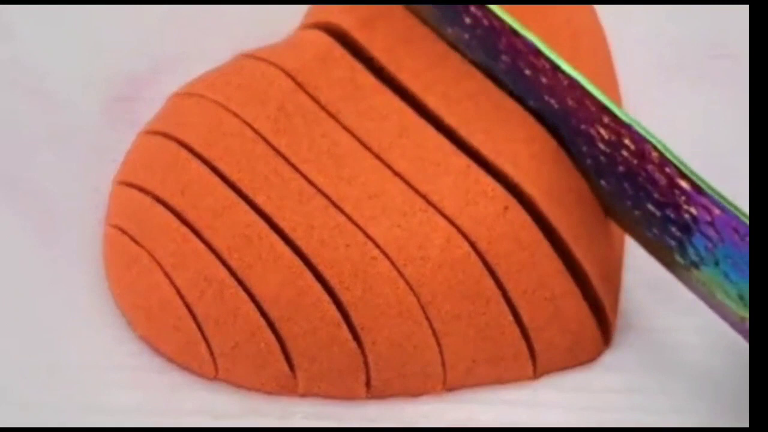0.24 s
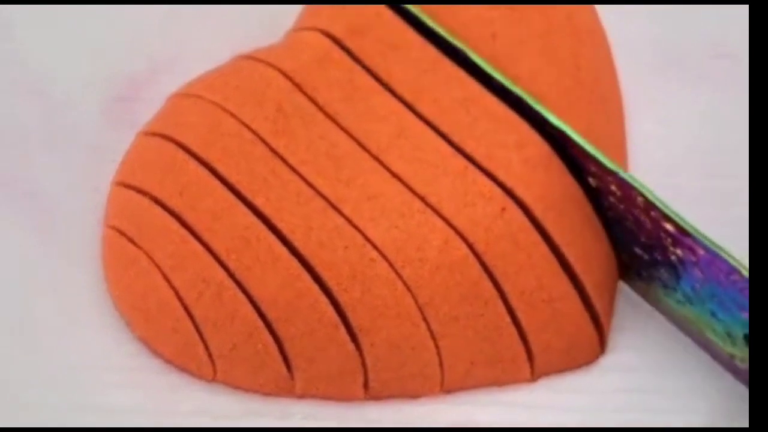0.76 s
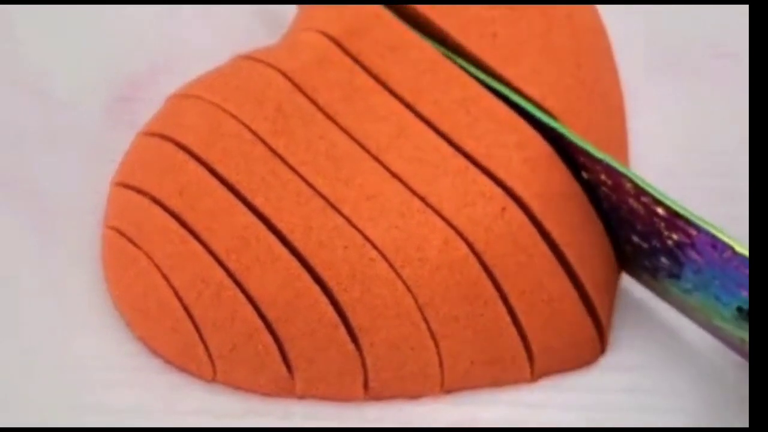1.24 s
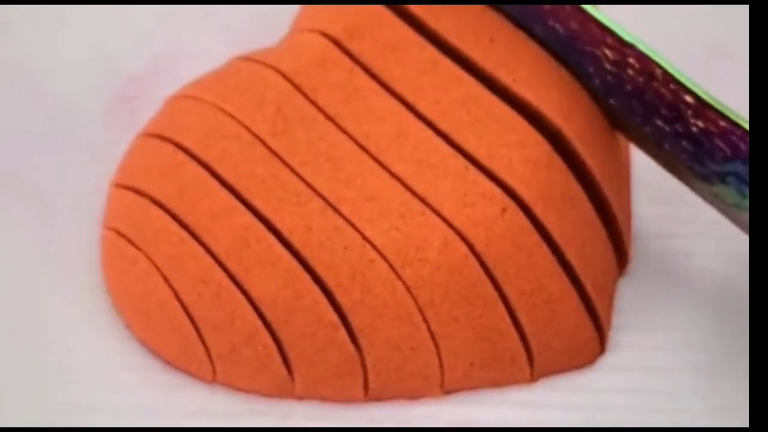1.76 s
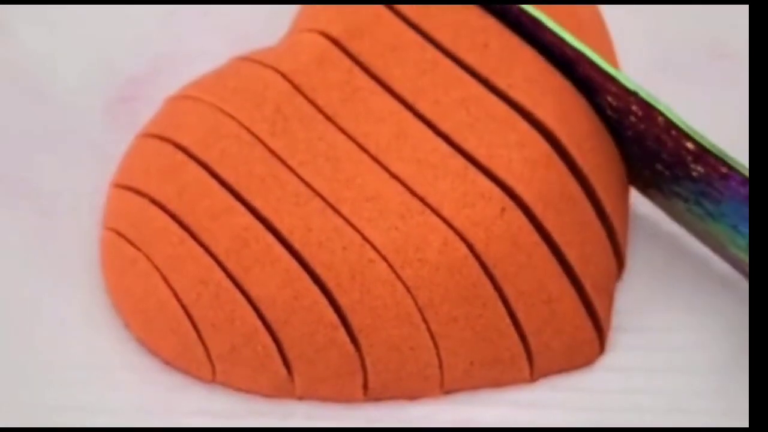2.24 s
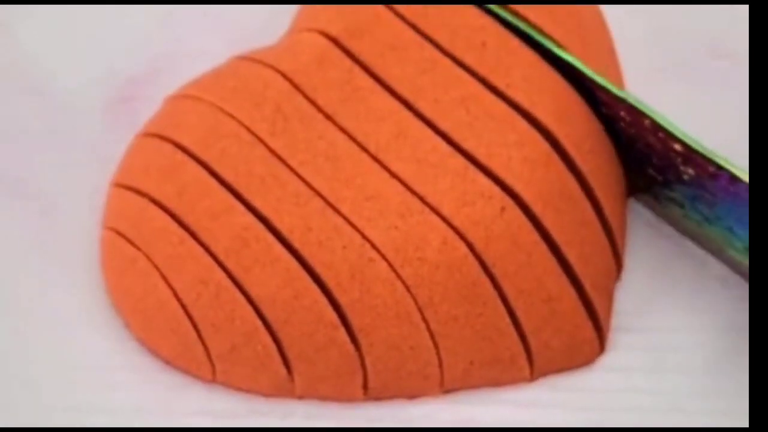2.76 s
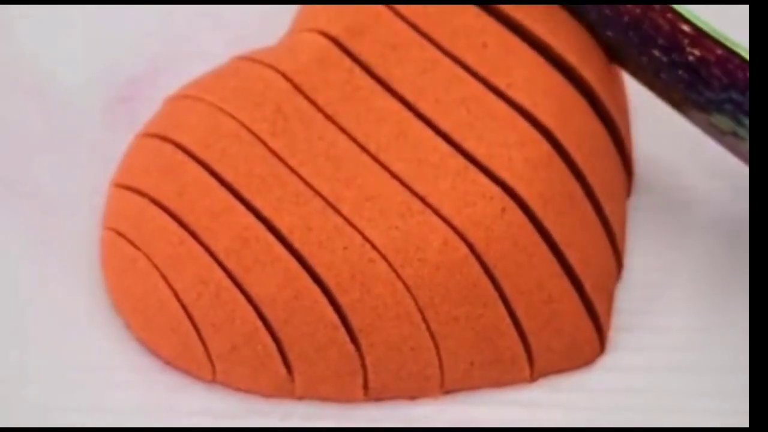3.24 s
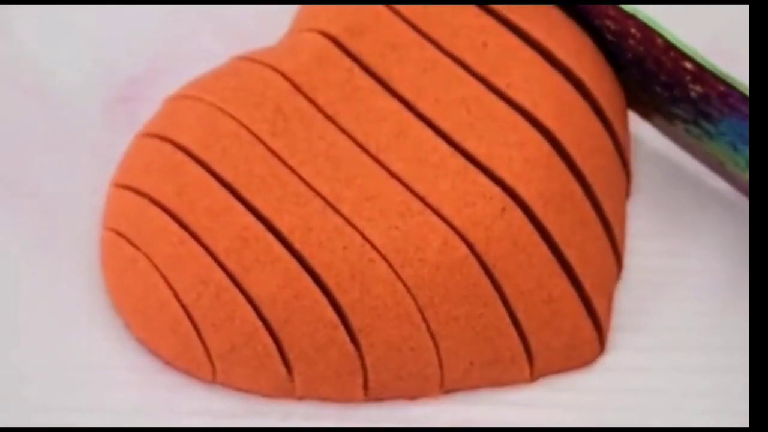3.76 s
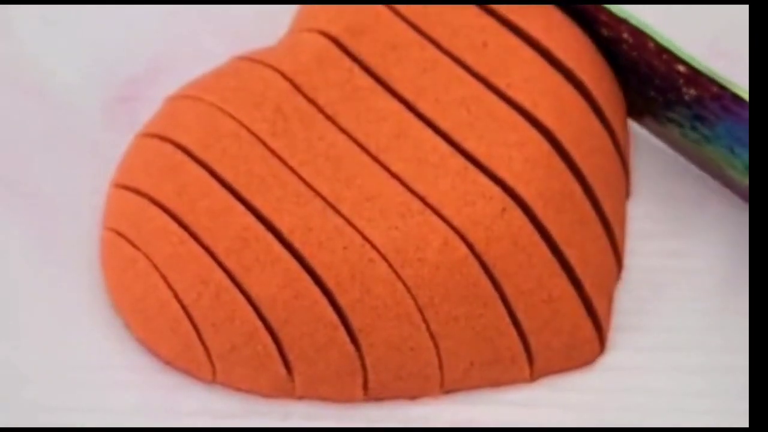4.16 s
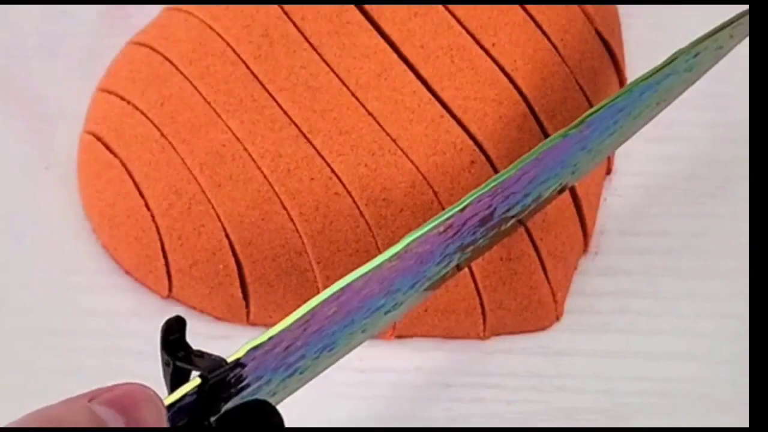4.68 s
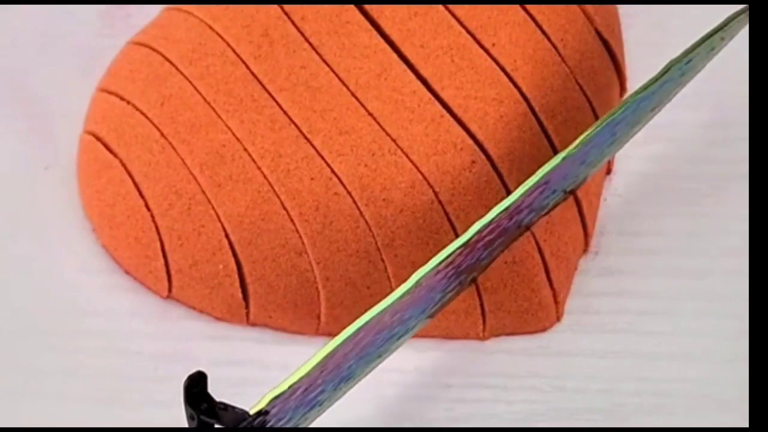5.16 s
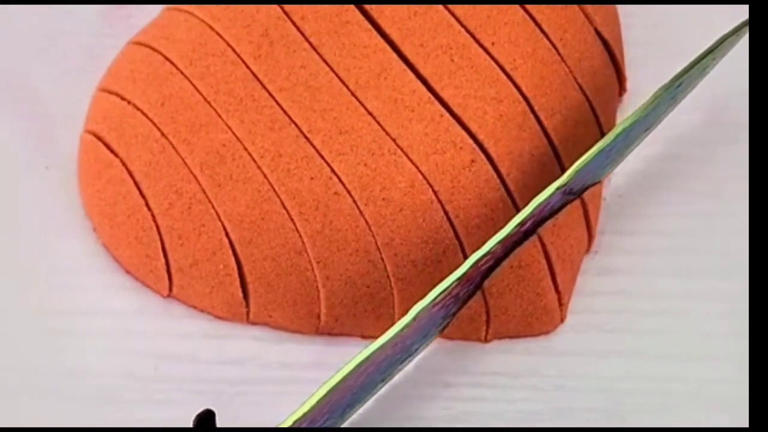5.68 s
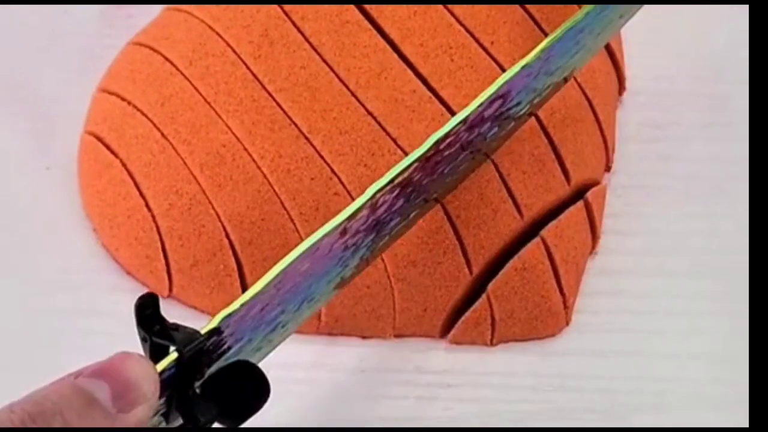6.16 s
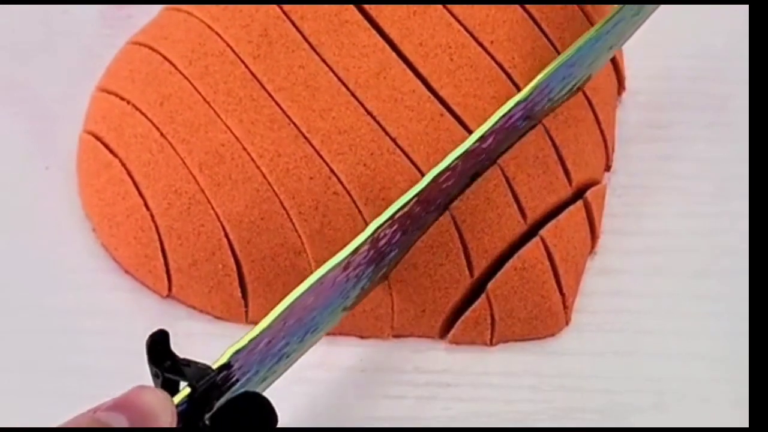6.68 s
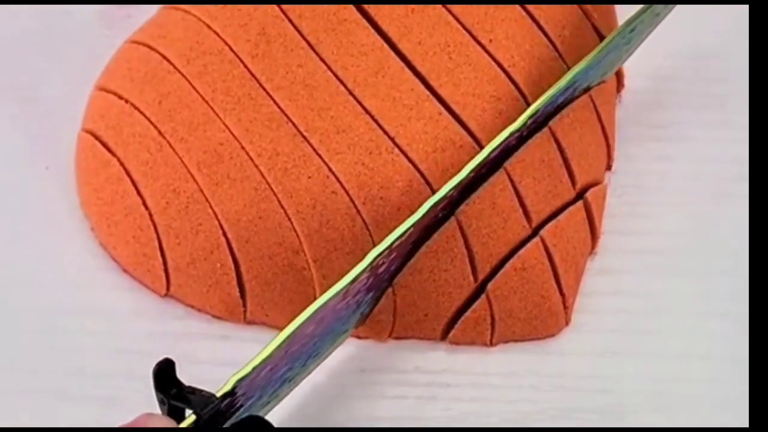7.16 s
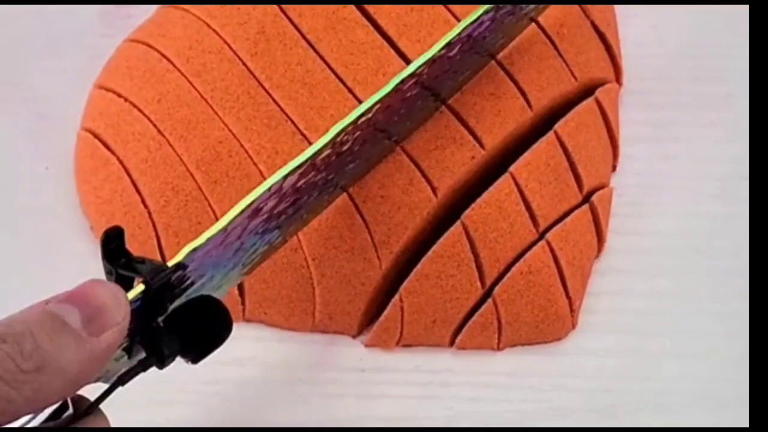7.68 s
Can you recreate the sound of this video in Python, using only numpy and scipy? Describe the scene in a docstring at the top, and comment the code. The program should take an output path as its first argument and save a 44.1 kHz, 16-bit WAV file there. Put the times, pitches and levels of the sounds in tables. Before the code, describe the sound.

Close, dry crunchy hisses of a blade pressing through damp packed sand, swelling and fading cut after cut, with dull taps on the board.

```python
"""On a board, close to the microphone: a knife slices a block of soft, sticky sand, six takes joined end to end.
Thousands of random grains, bunched in lumps, drive three filters: the hiss of sand, the scrape of the blade
and the rumble of the board. Narrow resonances let the blade sing, and short swinging pushes are its edge
knocking the board. The block is turned halfway, which changes how the board rings.
Hollows open and drift in the sound, and in places it spreads between left and right."""
import sys
import numpy as np
from scipy import signal
from scipy.io import wavfile
from scipy.ndimage import uniform_filter1d

SR = 44100
rng = np.random.default_rng(int(sys.argv[2]) if len(sys.argv) > 2 else 0)


def master_out(mix):
    """Clip the mix to full scale and print it as 16-bit PCM to the path in sys.argv[1]."""
    frames = np.transpose(np.atleast_2d(mix))
    ceiling = np.clip(frames, -1, 1)
    pcm = np.round(ceiling * 32767).astype(np.int16)
    wavfile.write(sys.argv[1], SR, pcm)


N = 349272

# where the takes begin, and the end of the last: start_s
TAKE_STARTS = [0, 1.311, 2.895, 4.528, 6.098, 7.673, 8]


def amp(db):
    """Amplitude factor of a level in dB."""
    return 10 ** (np.asarray(db) / 20)


def evened(x):
    """Scales a signal to rms 1."""
    return x / np.sqrt(np.mean(x ** 2) + 1e-20)


def read(points, hz):
    """Reads a colour curve at any pitch, straight between its points on a log pitch scale."""
    point_hz, level_db = np.transpose(points)
    return np.interp(np.log(hz + 1), np.log(point_hz + 1), level_db)


def response(colour, modes, size=8192):
    """Causal (minimum-phase) impulse response of energy 1 for a broad colour with resonances on it."""
    hz = abs(np.fft.fftfreq(size, 1 / SR))
    gain = amp(read(colour, hz))
    for mode_hz, width_hz, peak_db in modes:
        peak = 1 / (1 + (2 * (hz - mode_hz) / width_hz) ** 2)
        gain = gain * (1 + (amp(peak_db) - 1) * peak)
    log_gain = np.log(np.maximum(gain, 1e-5))
    phase = -signal.hilbert(log_gain).imag
    taps = np.fft.ifft(np.exp(log_gain + 1j * phase)).real[:size // 2]
    return taps / np.linalg.norm(taps)


def clumps(ms):
    """Uneven crumbling of rms 1: lumps at random moments that start sharply and decay with time constant ms."""
    decays = 1000 * np.arange(8192) / SR / ms
    lump = np.exp(-decays) * (1 - np.exp(-10 * decays))
    starts = rng.standard_normal(N) * (rng.random(N) < 4000 / ms / SR)
    x = signal.oaconvolve(abs(starts), lump)[:N]
    return evened(x - x.mean())


def grains(per_s, spread_db, crumble_db):
    """Grains that snap at random moments, a few of them large, swelling with the crumbling; rms 1."""
    size = amp(spread_db * np.minimum(rng.exponential(1, N), 5) + crumble_db)
    snaps = rng.random(N) < per_s / SR
    return evened(size * rng.standard_normal(N) * snaps)


def levels(t):
    """Hiss follows effort and slips, singing follows hiss, scrape and rumble follow a body level; all in dB."""
    # how hard the blade works, one curve a take; the first starts mid-cut, the last breaks off loud
    # columns: time_s, hiss_db
    effort = [
        [(0, -38), (.3, -37.5), (.5, -37.5), (.62, -40), (.73, -43), (.825, -42), (.85, -49), (.95, -47.5),
         (1.05, -47.5), (1.23, -49.5), (1.309, -47.5)],
        [(1.313, -60), (1.338, -52), (1.362, -49), (1.38, -45), (1.42, -46.5), (1.46, -36), (2.3, -37.5),
         (2.44, -42), (2.5, -48), (2.6, -50), (2.63, -41.5), (2.72, -41), (2.78, -48.5), (2.87, -48.5),
         (2.893, -55.5)],
        [(2.897, -73), (2.915, -54), (2.95, -50.5), (2.975, -43.5), (3.03, -39.5), (3.2, -37), (3.6, -37),
         (3.71, -41.5), (4.02, -42), (4.06, -50.5), (4.17, -44), (4.23, -40), (4.37, -40.5), (4.47, -45.5),
         (4.5, -52), (4.526, -58)],
        [(4.535, -70.5), (4.78, -71), (4.8, -65), (4.855, -64), (4.87, -56.5), (4.98, -48), (5.13, -42.5),
         (5.25, -44.5), (5.6, -45.5), (5.84, -49.5), (5.875, -55.5), (5.9, -61), (5.915, -44), (5.935, -43.5),
         (5.98, -46), (6.03, -47), (6.05, -60), (6.095, -78)],
        [(6.1, -53.5), (6.185, -50.5), (6.21, -40.5), (6.5, -38.5), (7.15, -41), (7.27, -44.5), (7.32, -44),
         (7.4, -44.5), (7.5, -47), (7.58, -44.5), (7.645, -43), (7.67, -64)],
        [(7.675, -56.5), (7.73, -49), (7.82, -42), (7.92, -38.5)],
    ]
    # sudden slips where a lump of sand gives way
    # columns: start_s, peak_hiss_db, length_ms, body_db (scrape and rumble re their usual share)
    slips = [(0.249, -36, 18, -17), (0.927, -42, 48, -4), (1.088, -44.5, 49, -8), (1.137, -42.5, 18, -11),
             (1.319, -45, 11, -10), (1.355, -52.5, 82, 8.5), (1.369, -37, 9.6, -12), (1.445, -37, 37, -6),
             (1.55, -40, 76, -2), (1.508, -37.5, 24, -2.5), (2.158, -36, 44, -1), (2.81, -49, 80, 1),
             (3.026, -37.5, 11, 1), (3.054, -35, 10, -9), (3.077, -36, 15, -14), (3.125, -33, 13, -1),
             (3.163, -34, 12, -3), (3.194, -33.5, 14, -8), (3.224, -33, 14, -3), (3.25, -36.5, 19, 1),
             (3.276, -36, 12, 2), (3.409, -38, 9.9, -12), (3.558, -36, 30, -8), (3.66, -40.5, 20, -9),
             (4.2, -34.5, 19, -6), (4.288, -34, 42, -1.5), (4.336, -40.5, 22, 6), (4.405, -39, 15, -3),
             (4.48, -35, 15, -2), (4.55, -64.5, 41, 1), (4.605, -67, 35, -5), (4.648, -57, 74, -1.5),
             (4.66, -60, 14, -6), (4.676, -54, 30, -9), (4.72, -63, 33, -5), (4.745, -62, 30, 1),
             (5.125, -44, 38, -5), (5.335, -42.5, 35, -3), (5.4, -43, 14, 0), (5.449, -39, 17, -16),
             (5.843, -41.5, 24, 1.5), (5.991, -39.5, 25, 4), (6.016, -46, 19, 3), (6.102, -41, 25, -10),
             (6.205, -38.5, 21, -6), (6.288, -38, 13, 1.5), (6.51, -38.5, 20, -3), (6.577, -37, 14, -15),
             (6.62, -40, 18, -4), (6.64, -42, 28, 5), (7.51, -42, 41, -0.5), (7.69, -59, 18, -6),
             (7.779, -41, 8.6, -5), (7.872, -33.5, 20, -6)]
    # how each take loads blade and board
    # columns: scrape_db and rumble_db (re hiss at the usual level), growth_db_per_s (both, as the blade sinks)
    loads = [(-9.5, -4, 0.1), (-10, -4.5, 1.5), (-9, -4.5, 2), (-7.5, -6, 2.5), (-9, -7, 2),
             (-11, -7.5, 13)]
    usual_db = -36.5
    scrape_follows, rumble_follows, song_follows = 1, 1.345, 1  # dB per dB away from the usual level
    slip_rise = 0.13  # share of its length that a slip takes to swell

    steady_power = amp(np.interp(t, *np.concatenate(effort).T)) ** 2
    hiss_power, body_power = steady_power.copy(), steady_power.copy()
    for start_s, peak_db, length_ms, share_db in slips:
        u = np.clip(1000 * (t - start_s) / length_ms, 0, 1)
        ramp = np.minimum(u / slip_rise, (1 - u) / (1 - slip_rise))
        swell = np.sin(np.pi / 2 * ramp) ** 2
        hiss_power += amp(peak_db) ** 2 * swell
        body_power += amp(peak_db + share_db) ** 2 * swell

    take = np.searchsorted(TAKE_STARTS, t, "right") - 1
    scrape_share_db, rumble_share_db, growth_db_per_s = np.array(loads)[take].T
    sunk_db = usual_db + growth_db_per_s * (t - np.array(TAKE_STARTS)[take])
    hiss_db = 10 * np.log10(hiss_power)
    body_off_db = 10 * np.log10(body_power) - usual_db
    scrape_db = sunk_db + scrape_share_db + scrape_follows * body_off_db
    rumble_db = sunk_db + rumble_share_db + rumble_follows * body_off_db
    song_db = usual_db + song_follows * (hiss_db - usual_db)
    return hiss_db, scrape_db, rumble_db, song_db


def bodies():
    """How sand, blade and board ring: impulse responses of hiss, scrape and rumble for each of the six takes."""
    # broad colours, columns: pitch_hz, level_db (per Hz); the hiss of the last two takes has its own
    hiss = [(1650, -21), (2800, -10.5), (3970, -7), (5630, -2), (6240, -4), (6770, -3.5), (7680, 1.5),
            (10200, 2), (11100, 2), (13800, 2.5), (15100, 0), (16100, 17), (16500, -40)]
    hiss_later = [(1650, -30), (2800, -20), (3970, -8), (5630, -1.5), (6770, -0.5), (7680, 2), (10200, 3),
                  (13800, 1.5), (15100, 0.5), (16100, 15.5), (16500, -34)]
    scrape = [(530, -34.5), (900, 3), (988, -2), (1340, -1.5), (1620, -2.5), (1990, -2), (2200, -1),
              (2890, -2), (3600, -9), (4680, -17.5), (7920, -120)]
    rumble = [(12, -49), (20, -28.5), (129, -3.5), (369, -1), (411, 1.5), (508, -8), (576, -3.5),
              (1400, -18), (1820, -63), (3080, -120)]
    rumble_turned = [(12, -56), (20, -31), (134, -1), (178, -9.5), (220, 0.5), (433, -4), (596, -8),
                     (1400, -15), (1820, -72), (3080, -120)]
    # the blade sits differently after the turn and again one take later: two such colours
    scrape_turned = [
        [(470, -32.5), (800, -3.5), (1150, -7), (1320, -2.5), (1530, -11), (1850, -1.5), (2660, -12),
         (3600, -14.5), (4680, -16), (7920, -120)],
        [(470, -46), (800, -11.5), (1050, -15), (1130, -19), (1510, -10.5), (1890, -2), (2220, -9),
         (3600, -13.5), (4680, -15), (7920, -120)],
    ]
    # resonances standing out of those colours, columns: pitch_hz, width_hz, peak_db
    blade = [(1880, 140, 2.5), (6150, 100, 3.5), (7500, 81, 6.5), (11080, 100, 7)]
    board = [(125, 140, 3.6), (197.4, 12, 5.4), (326, 35, 5.9), (425, 26, 6.7), (572, 33, 4.7),
             (687, 33, 8.3), (904, 11, 14.2)]
    board_turned = [(140, 36, 6.3), (218.5, 21, 3.3), (285, 21, 3.6), (376.5, 29, 6.5), (598, 76, 9.8),
                    (700, 30, 9.5), (944, 75, 4.7)]

    first = response(hiss, blade), response(scrape, blade), response(rumble, board)
    turned_board = response(rumble_turned, board_turned)
    turned = response(hiss, blade), response(scrape_turned[0], blade), turned_board
    later = response(hiss_later, blade), response(scrape_turned[1], blade), turned_board
    return [first] * 3 + [turned] + [later] * 2


def ringing(drives):
    """Sends the three drives through their bodies; the ringing stops dead at each join."""
    out = np.zeros(N)
    for start_s, end_s, take_bodies in zip(TAKE_STARTS, TAKE_STARTS[1:], bodies()):
        at = slice(round(start_s * SR), min(round(end_s * SR), N))
        for drive, body in zip(drives, take_bodies):
            out[at] += signal.oaconvolve(drive[at], body)[:at.stop - at.start]
    return out


def singing(drive):
    """Grains excite four narrow modes of the blade; the lowest bends as the sand grips the blade."""
    # what a slowly dragged blade sings with; the first pitch gives way to the bending one
    # columns: pitch_hz, width_hz, level_db (re hiss, before the swell along the take)
    modes = [(1956, 84, -20), (6330, 58, -25.5), (7500, 400, -36), (11500, 340, -24.5)]
    # how the blade sings along each take
    # columns: time_s, lowest_mode_hz, lowest_mode_db, second_mode_db (both added to the mode level)
    course = [
        [(0.0, 1980, 4, 15), (0.16, 1820, 3.5, 7), (0.8, 1930, 2, 1), (0.93, 1910, 7.5, 7), (1.31, 1960, 6, 16)],
        [(1.312, 2020, 12, 5), (1.372, 2140, 5, 15), (1.438, 1910, 5.5, 11.5), (2.76, 1970, 4, 6),
         (2.894, 2000, 9, 8)],
        [(2.896, 1990, 11, 4), (3.014, 1980, 6, 15), (3.144, 1780, 1, 15), (3.24, 1940, 5.5, -3),
         (4.108, 2050, 5.5, 9), (4.527, 2020, 5, -11)],
        [(4.53, 1820, 0, 0), (4.608, 1920, 14.5, 2), (4.892, 1860, 2, 4), (5.968, 1880, -1, 5),
         (6.052, 2020, 1, 4), (6.097, 1950, -1, 5)],
        [(6.1, 1960, 9, -2), (6.178, 1850, 14, 19), (6.304, 1904, 3.5, -6), (7.536, 1850, -2, 7),
         (7.672, 2000, 8, 3)],
        [(7.675, 1900, 9, 1), (7.92, 1890, 11.5, 3)],
    ]

    t = np.arange(N) / SR
    time_s, low_hz, low_db, second_db = np.concatenate(course).T
    shift_hz = np.interp(t, time_s, low_hz) - modes[0][0]
    bend = np.exp(2j * np.pi * np.cumsum(shift_hz) / SR)
    flat_db = 0 * time_s
    turns, swells_db = [bend, 1, 1, 1], [low_db, second_db, flat_db, flat_db]
    out = np.zeros(N)
    for (hz, width_hz, level_db), turn, swell_db in zip(modes, turns, swells_db):
        pole = np.exp((2j * hz - width_hz) * np.pi / SR)
        gain = np.sqrt(4 * np.pi * width_hz / SR)  # keeps the rms of a noisy drive
        # shifting the drive down and the ring back up bends the resonance itself
        ring = turn * signal.lfilter([gain], [1, -pole], drive / turn)
        out += amp(level_db + np.interp(t, time_s, swell_db)) * ring.real
    return out


def knocks():
    """The edge meets the board: a sudden push, a few swings of the block, a dull thud and a crunch of grains."""
    # contacts, levels as they stand before envelopes and the share that blade and board take
    # columns: start_s, push_db, swing_hz, contact_ms, crunch_db (re push), thud_db (re push)
    contacts = [(0.92, -40, 487, 5, -9, -15), (2.461, -30.5, 430, 4.6, -15, -14),
                (2.516, -35.5, 424, 8.2, -23, -17), (2.688, -32, 440, 10, -20, -12),
                (2.701, -35, 250, 6, -20, -3), (2.7097, -26.5, 800, 5, -16, -12),
                (2.7173, -23, 423, 3.1, -12, -3), (4.407, -44, 460, 6.7, 4, -15),
                (4.477, -31, 402, 4.2, -19, -12), (4.486, -21, 366, 10.6, -26, -8.5),
                (4.752, -60, 180, 9.1, -30, -6), (4.81, -61, 130, 10, -30, -8),
                (4.875, -46.5, 557, 6, -27, -5), (4.988, -33, 500, 1.4, -5, -8),
                (5.341, -38, 600, 1.6, 0, -15), (5.8497, -19.5, 524, 2.7, -32, -10),
                (5.857, -30.5, 450, 4.2, -21, -5), (5.995, -31.5, 690, 4.4, 0, -3),
                (6.019, -27, 810, 2.4, -3, -25), (7.642, -35.5, 300, 3.2, -20, -6)]
    push, crunch = np.zeros(N), np.zeros(N)
    t = np.arange(1024) / SR
    for start_s, push_db, swing_hz, contact_ms, crunch_db, thud_db in contacts:
        u = 1000 * t / max(contact_ms, 1)
        start = round(start_s * SR)
        at = slice(start, start + 1024)
        onset = np.minimum(t / 0.00016, 1)
        swings = np.cos(2 * np.pi * swing_hz * t) * np.sqrt(1 - np.minimum(u, 1)) * onset
        thud = amp(thud_db) * u * np.exp(1 - u * 0.58)
        push[at] += amp(push_db) * (swings - thud)
        crunch[at] += amp(push_db + crunch_db) * rng.standard_normal(1024) * np.exp(-u * 3.2)
    return push, crunch


def tone_field(hz, t):
    """Level changes in dB over pitch and time: small random patches, thin streaks and a slow sway of tone."""
    # the sway of two broad bands, bass and upper scrape
    # columns: time_s, bass_db, upper_scrape_db
    tone = [(0, 1.5, -3), (.6, -2.5, 2.5), (1.0, 3.5, 1), (1.33, -1, 3), (1.38, 7, 0.5), (1.65, 2.5, -2),
            (1.9, -3, 1.5), (2.3, -1, 3.5), (2.75, 2, 0), (3.4, 0, -2), (4.4, -1, 0), (5.2, 3, -4),
            (5.7, 0, 4.5), (6.0, 3, 0), (6.3, 3.5, -3.5), (7.3, -3.5, 4), (7.92, -3, -0.5)]
    bass_hz, bass_width_hz, upper_hz, upper_width_hz = 186, 190, 2860, 800

    def blurred(bins, frames):
        noise = rng.standard_normal((len(hz), len(t)))
        return evened(uniform_filter1d(uniform_filter1d(noise, bins, axis=0), frames, axis=1))

    patches_db = 0.94 * blurred(24, 16)
    streaks_db = 2.2 * blurred(2, 30)
    time_s, bass_db, upper_db = np.transpose(tone)
    bass_band = 1 / (1 + (2 * (hz - bass_hz) / bass_width_hz) ** 4)
    upper_band = 1 / (1 + (2 * (hz - upper_hz) / upper_width_hz) ** 2)
    sway_db = np.outer(bass_band, np.interp(t, time_s, bass_db))
    sway_db += np.outer(upper_band, np.interp(t, time_s, upper_db))
    return patches_db + streaks_db + sway_db


def hollows(hz, t):
    """Depth in dB of narrow bands that sink for a while and drift, their pitch and width ragged."""
    # columns: start_s, end_s, from_hz, to_hz, width_hz (before it wavers), depth_db
    bands = [(0.963, 1.1, 1050, 1000, 400, 6), (4.7, 4.79, 4250, 4250, 500, 7),
             (2.984, 3.13, 1440, 1320, 400, 6), (3.218, 3.55, 1540, 1620, 260, 5),
             (2.93, 3.223, 5700, 5600, 300, 11), (3.06, 3.202, 6650, 6700, 380, 20),
             (3.208, 3.3, 6680, 6700, 520, 50), (3.28, 3.4, 6900, 6950, 300, 18),
             (3.39, 3.552, 6660, 7000, 910, 33), (3.41, 3.72, 7300, 7200, 450, 19),
             (3.532, 3.81, 6610, 6730, 530, 48), (3.8, 4.06, 6900, 6800, 500, 12),
             (4.074, 4.25, 6550, 6630, 755, 45), (4.223, 4.415, 6740, 6570, 935, 34),
             (3.2, 3.76, 12000, 11700, 250, 14), (4.05, 4.5, 12000, 11800, 280, 20),
             (4.59, 4.875, 1220, 1150, 675, 11), (4.54, 4.64, 2450, 2400, 400, 7),
             (5.5, 5.7, 5950, 5900, 200, 14), (4.602, 4.68, 3570, 3550, 250, 32),
             (4.67, 4.788, 3420, 3380, 200, 30), (4.638, 4.69, 2400, 2360, 250, 25),
             (4.79, 4.872, 2730, 2600, 330, 38), (4.927, 5.04, 4450, 4440, 420, 40),
             (5.04, 5.11, 4640, 4630, 450, 32), (5.11, 5.22, 4750, 4830, 650, 55),
             (5.198, 5.35, 4800, 4730, 810, 60), (5.337, 5.46, 4500, 4320, 550, 55),
             (5.43, 5.706, 4640, 4740, 930, 62), (5.685, 5.872, 4800, 4900, 890, 43),
             (5.86, 5.93, 4840, 4700, 800, 25), (5.923, 6.05, 4630, 4560, 980, 65),
             (6.03, 6.102, 4380, 4330, 700, 28), (5.017, 5.29, 8200, 8160, 513, 55),
             (5.104, 5.17, 7800, 7800, 600, 55), (5.013, 5.333, 7700, 7400, 282, 42),
             (5.268, 5.344, 7700, 7700, 450, 50), (5.346, 5.406, 7350, 7400, 500, 35),
             (5.456, 5.815, 7900, 7870, 1380, 70), (5.878, 6.087, 8100, 7960, 1270, 59),
             (6.188, 6.364, 3380, 3360, 384, 47), (6.35, 6.46, 3400, 3400, 260, 41),
             (6.456, 6.54, 3330, 3330, 380, 39), (6.53, 6.636, 3430, 3400, 220, 28),
             (6.72, 6.9, 3420, 3420, 200, 15)]
    # hollows between 2.5 and 5 kHz recur higher up
    # columns: above_hz, depth_share (ratio), width_share (ratio)
    repeats = [(5530, 0.76, 0.65), (9700, .9, 0.97)]
    fade_s = 0.02
    total_db = np.zeros((len(hz), len(t)))
    for start_s, end_s, from_hz, to_hz, width_hz, depth_db in bands:
        waver = [evened(uniform_filter1d(row, 12)) for row in rng.standard_normal((2, len(t)))]
        fade = np.clip(0.5 + np.minimum(t - start_s, end_s - t) / fade_s, 0, 1)
        centre_hz = np.interp(t, [start_s, end_s], [from_hz, to_hz]) + 0.06 * width_hz * waver[0]
        ragged_hz = width_hz * amp(waver[1])
        on = fade > 0
        copies = [(0, 1, 1)] + (repeats if 2500 < from_hz < 5000 else [])
        for above_hz, depth_share, width_share in copies:
            offset_hz = hz[:, None] - centre_hz[on] - above_hz
            band = np.exp(-(2 * offset_hz / (width_share * ragged_hz[on])) ** 8)
            total_db[:, on] += depth_share * depth_db * fade[on] * band
    return total_db


def spread(drive):
    """Grains that reach the two sides unlike: the side signal, present only during two stretches."""
    # columns: start_s, end_s, side_db (re hiss)
    stretches = [(4.58, 6.104, -8.5), (6.198, 7.7, -15.5)]
    # the colour of each stretch, columns: pitch_hz, level_db (per Hz)
    colours = [
        [(59, -43), (100, -25), (422, -20), (868, -23), (944, -28), (1190, -63), (1410, -43), (1860, 1),
         (2500, -18), (4070, -6), (4620, -12), (5480, -5), (7690, -12), (11000, 4), (15800, -25)],
        [(180, -108), (300, -80), (599, -18), (917, 10), (1680, 6), (1820, -14), (1940, -66), (2200, -66),
         (2860, -100), (4840, -120)],
    ]
    t = np.arange(N) / SR
    side = np.zeros(N)
    for (start_s, end_s, side_db), colour in zip(stretches, colours):
        coloured = signal.oaconvolve(drive, response(colour, []))[:N]
        side += amp(side_db) * coloured * (t > start_s) * (t < end_s)
    return side


def shaded(x):
    """Lays the tone field and the hollows over the short-time spectrum, alike on mid and side."""
    hz, t, spectrum = signal.stft(x, SR, nperseg=1024, noverlap=896)
    field_db = tone_field(hz, t) - hollows(hz, t)
    return signal.istft(spectrum * amp(field_db), SR, nperseg=1024, noverlap=896)[1][:, :N]


def cutting():
    """One crumbling drives hiss, blade and board, each with its own grains; returns mid and side."""
    hiss_db, scrape_db, rumble_db, song_db = levels(np.arange(N) / SR)
    # a fast, loud cut pours evenly; a slow, quiet one sticks and slips
    slowness = np.clip(0.43 + 0.49 * (-39.0 - hiss_db), 0.2, 0.9)
    crumble = slowness * (0.55 * clumps(28) + 0.94 * clumps(7.1))
    push, crunch = knocks()

    hiss = amp(hiss_db) * grains(30000, 1.56, 1.41 * crumble)
    hiss += 0.33 * crunch
    scrape = amp(scrape_db) * grains(9000, 0.37, 0.92 * crumble + 0.26 * clumps(8.7))
    scrape += crunch + 0.14 * push
    rumble = amp(rumble_db) * grains(6000, 1.05, crumble + 0.24 * clumps(2.9))
    rumble += 0.11 * push
    song_drive = amp(song_db) * grains(9000, 0.77, 0.49 * crumble + 0.5 * clumps(30))
    side_drive = amp(hiss_db) * grains(20000, 0.91, 0.49 * crumble)

    mid = ringing((hiss, scrape, rumble)) + singing(song_drive)
    return shaded(np.array([mid, spread(side_drive)]))


def scene():
    """Left is mid plus side, right is mid minus side."""
    mid, side = cutting()
    return np.array([mid + side, mid - side])


def record(dry):
    """The band limit: a steep low-pass that ends the treble without shifting its timing."""
    edge_hz = 15830
    low_pass = signal.firwin(1023, edge_hz, window=("kaiser", 10), fs=SR)
    return signal.oaconvolve(dry, low_pass[None], "same")


dry = scene()
out = record(dry)
master_out(out)
```